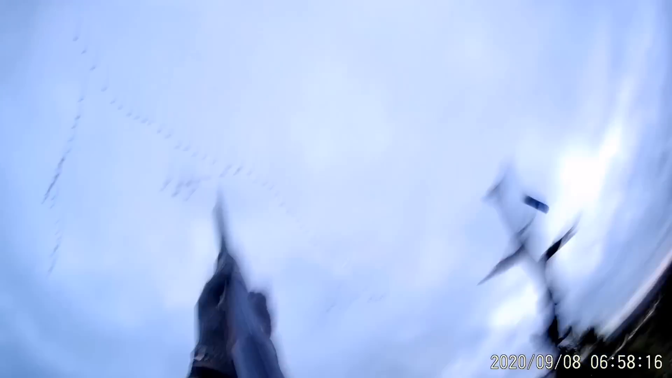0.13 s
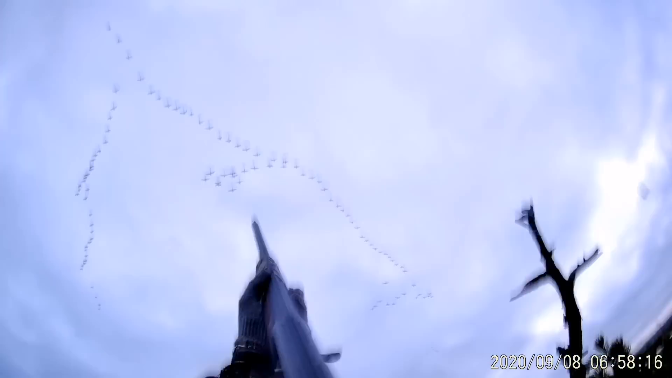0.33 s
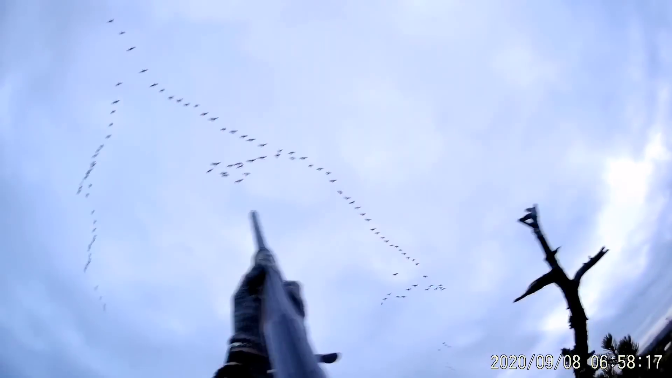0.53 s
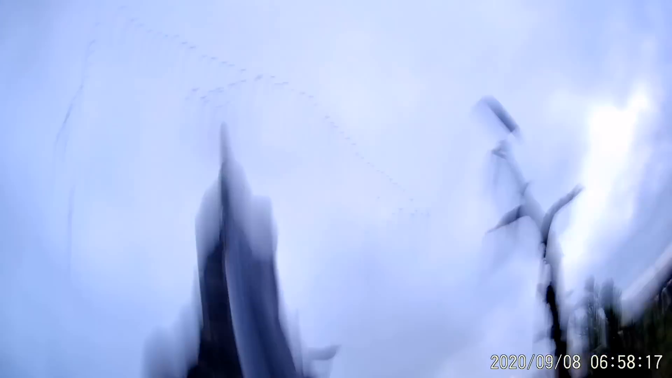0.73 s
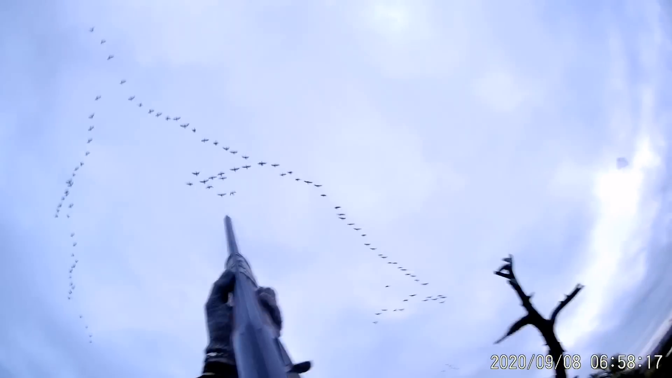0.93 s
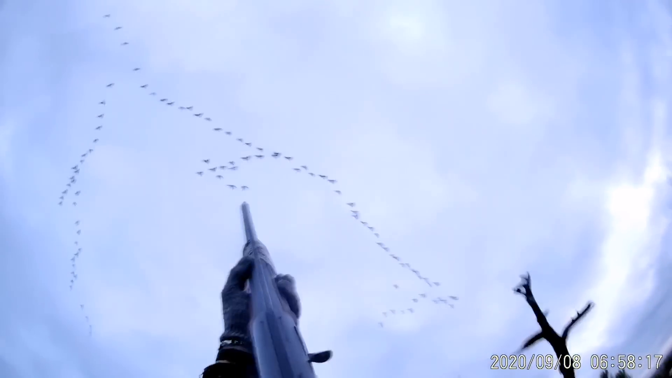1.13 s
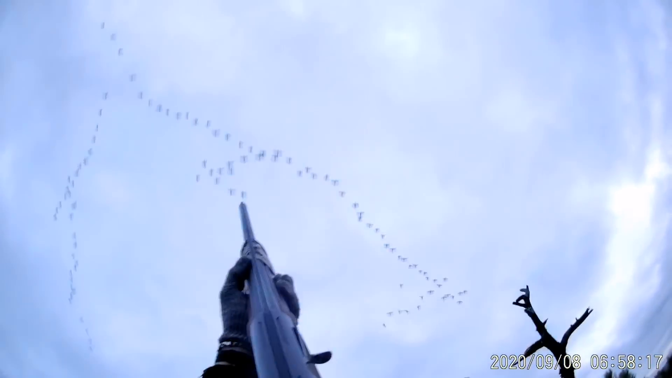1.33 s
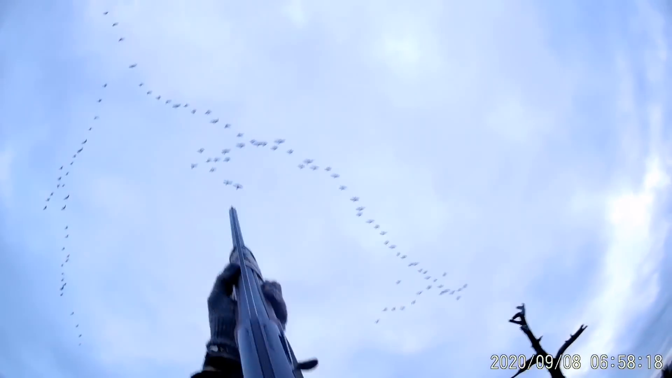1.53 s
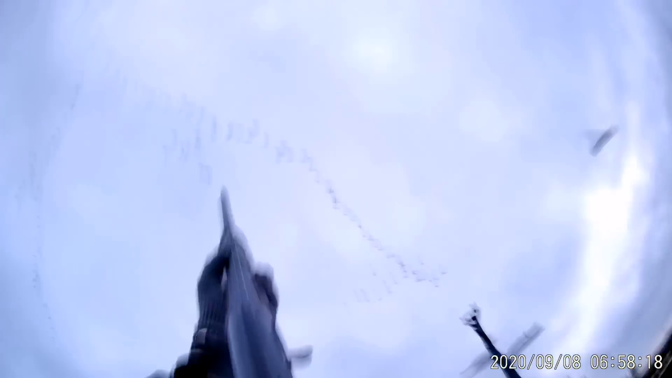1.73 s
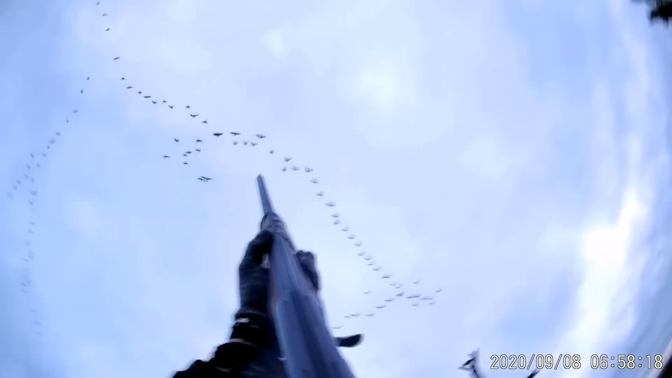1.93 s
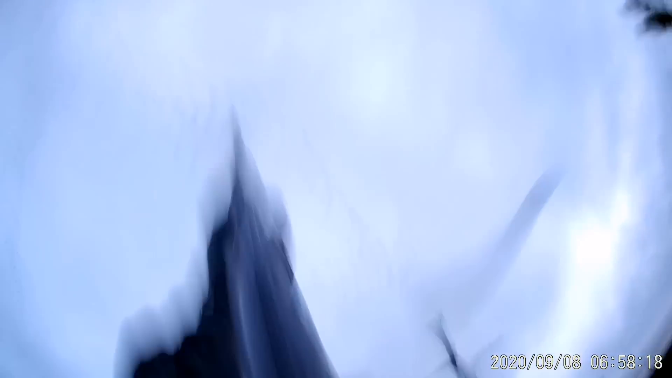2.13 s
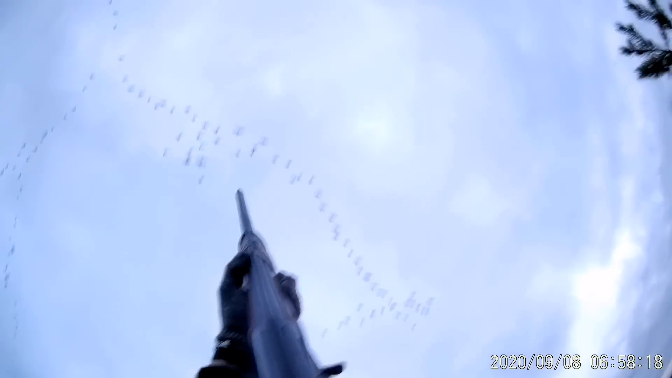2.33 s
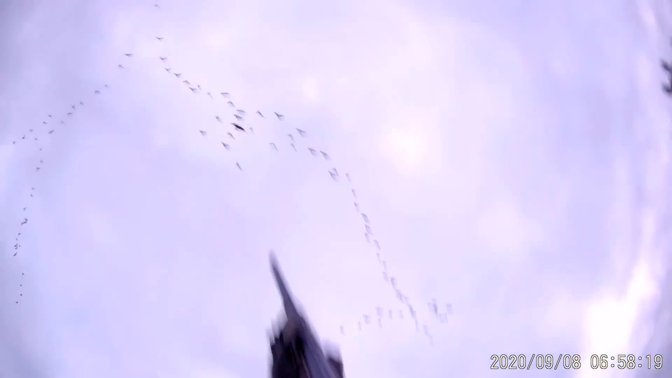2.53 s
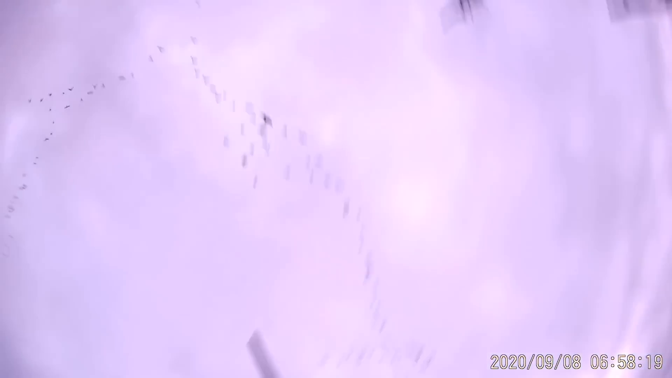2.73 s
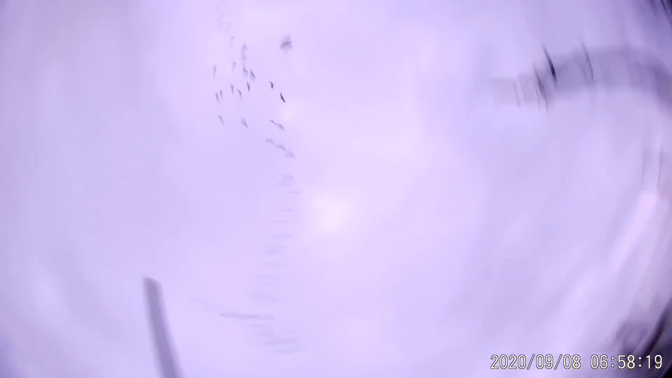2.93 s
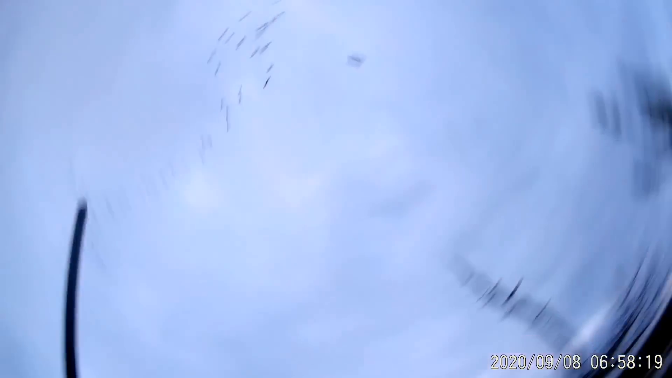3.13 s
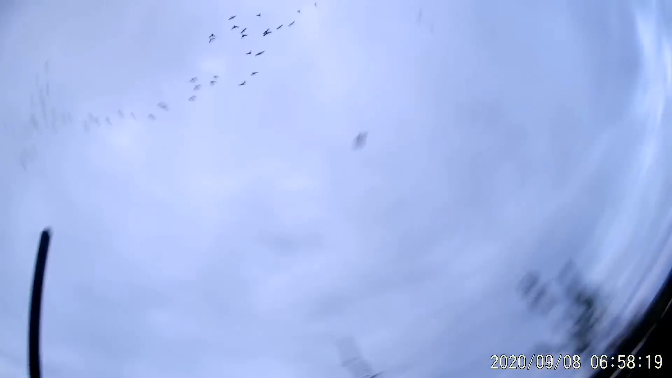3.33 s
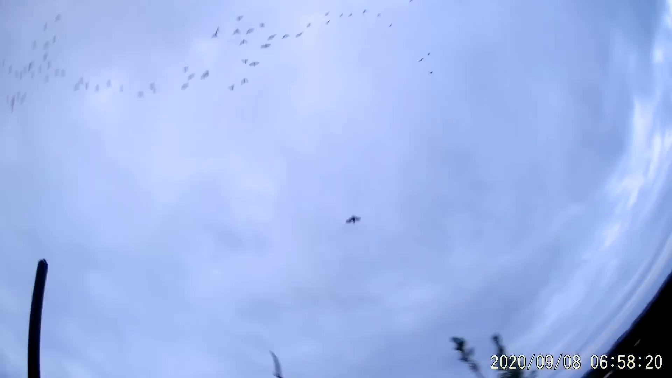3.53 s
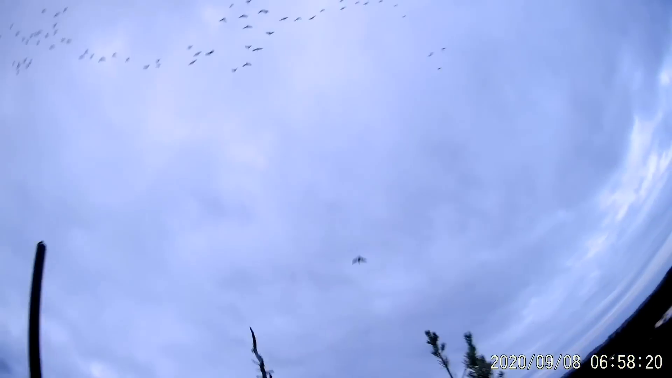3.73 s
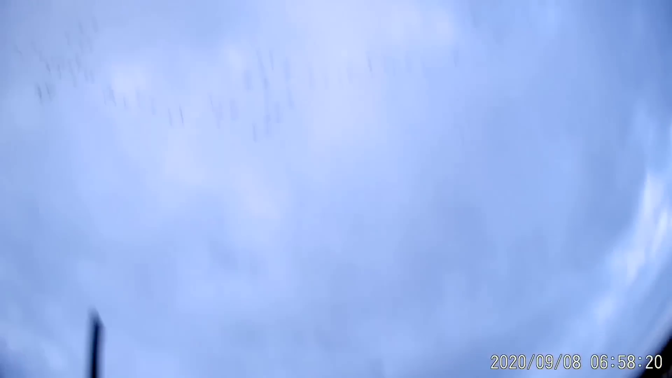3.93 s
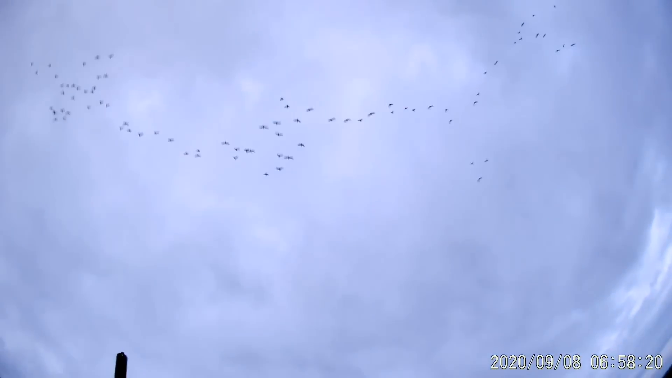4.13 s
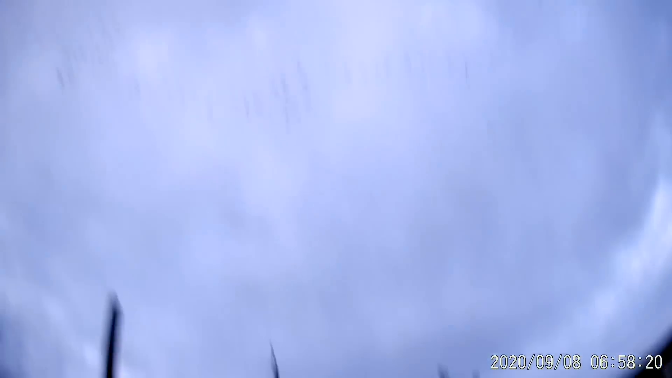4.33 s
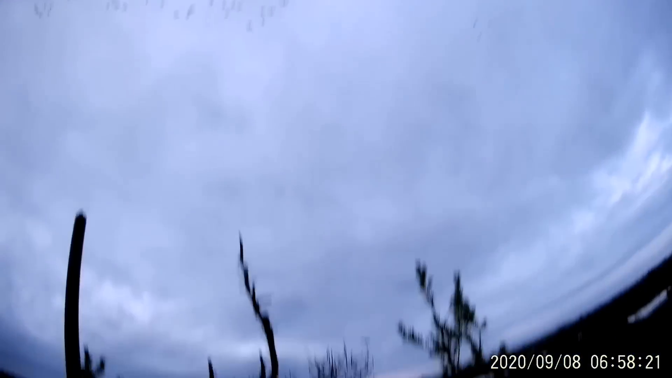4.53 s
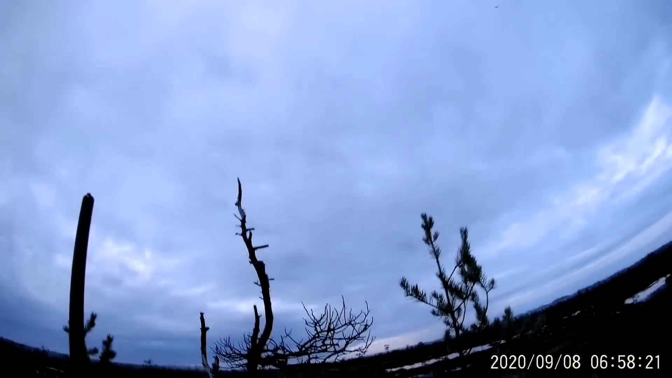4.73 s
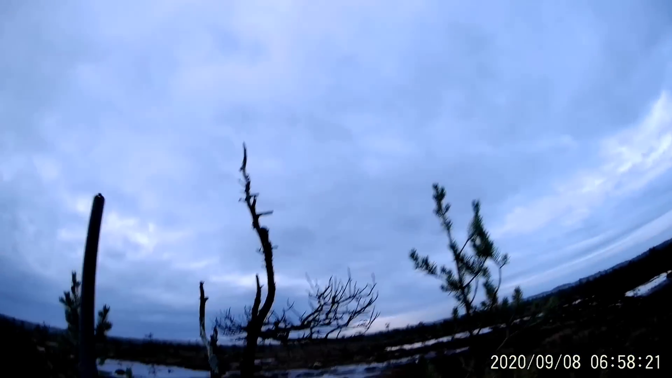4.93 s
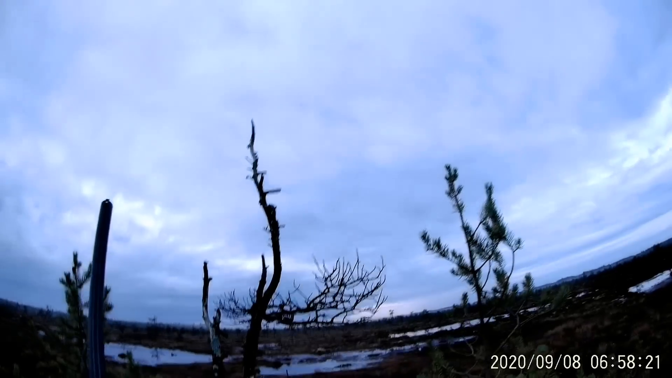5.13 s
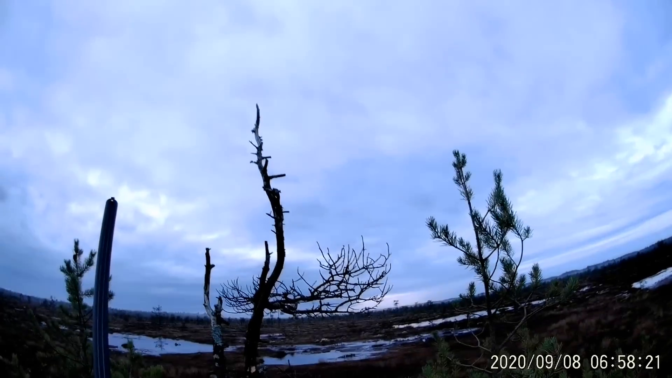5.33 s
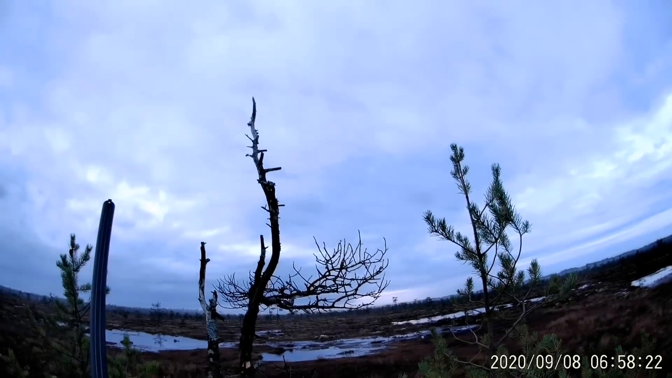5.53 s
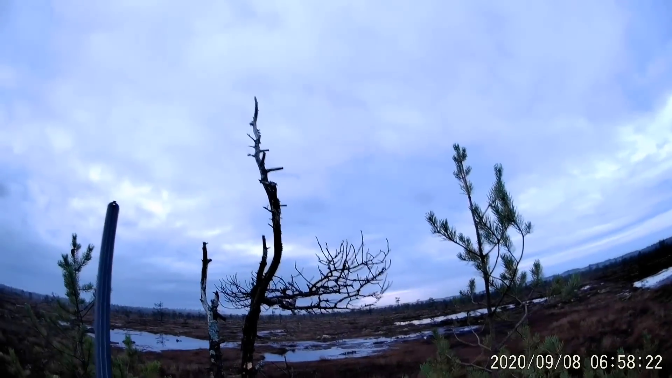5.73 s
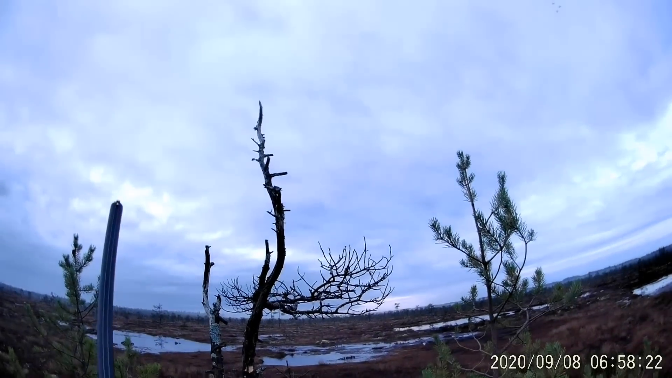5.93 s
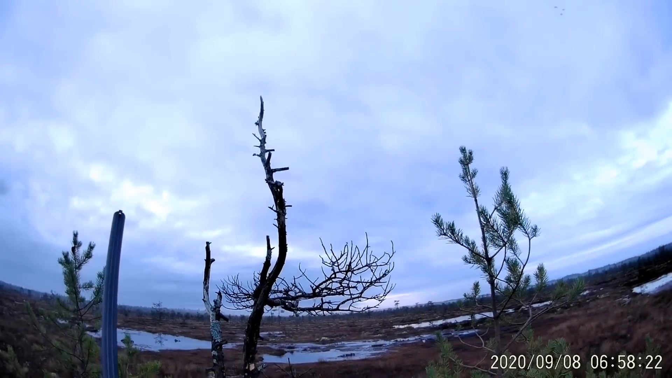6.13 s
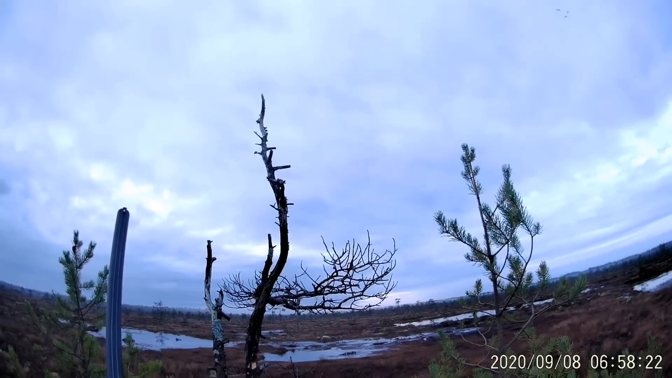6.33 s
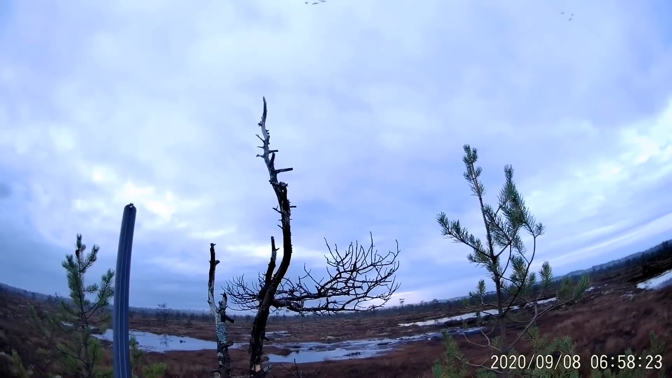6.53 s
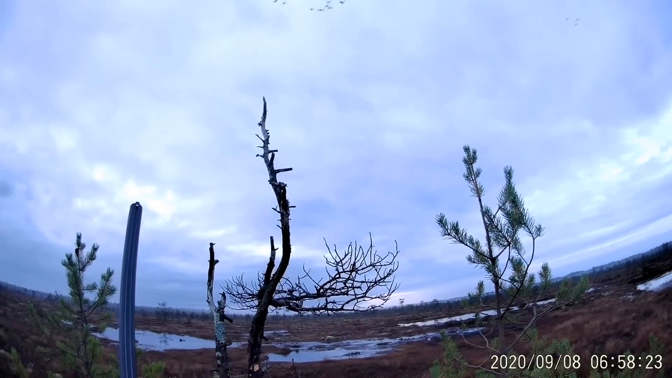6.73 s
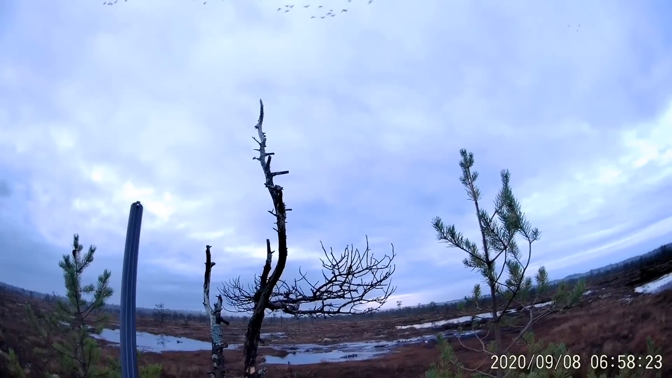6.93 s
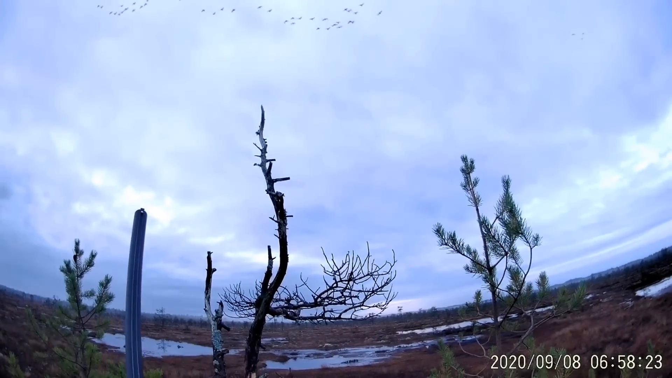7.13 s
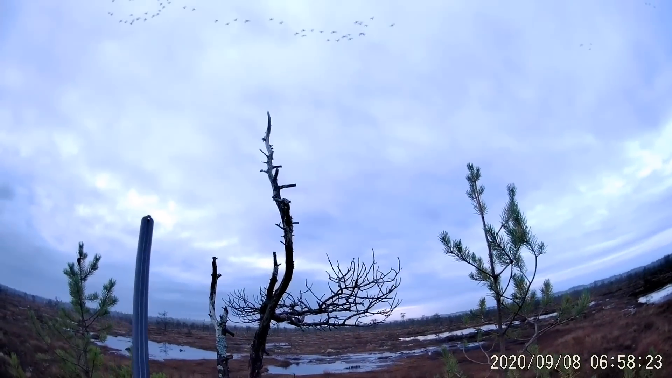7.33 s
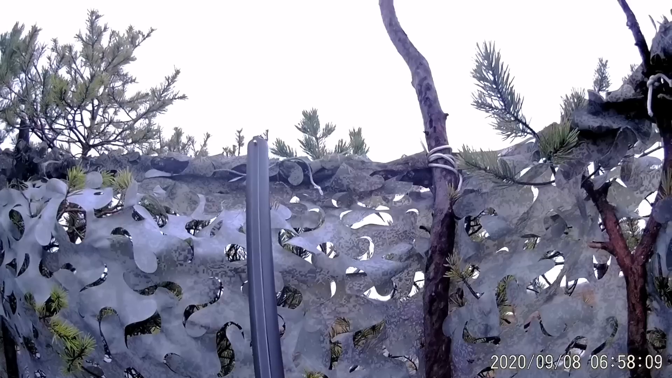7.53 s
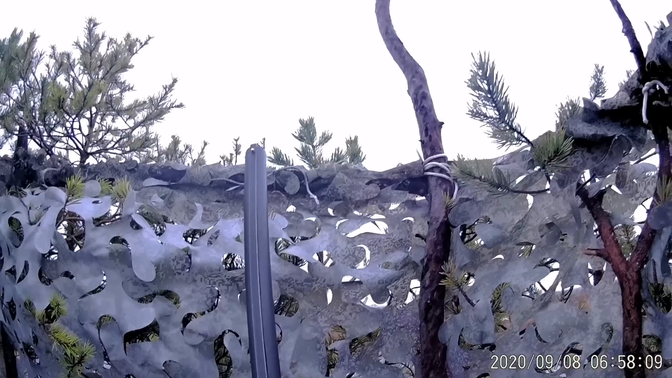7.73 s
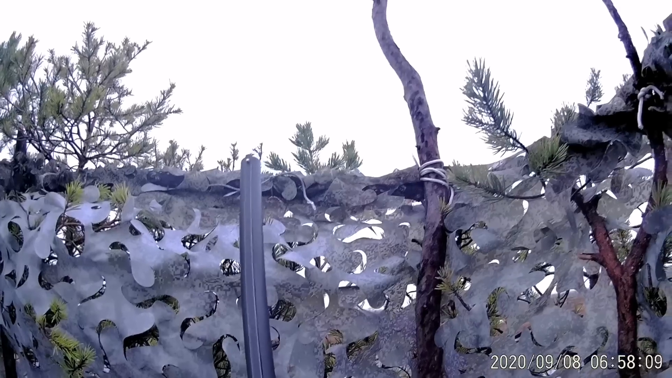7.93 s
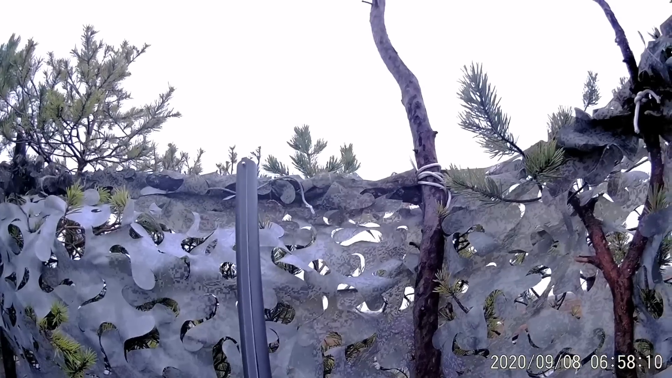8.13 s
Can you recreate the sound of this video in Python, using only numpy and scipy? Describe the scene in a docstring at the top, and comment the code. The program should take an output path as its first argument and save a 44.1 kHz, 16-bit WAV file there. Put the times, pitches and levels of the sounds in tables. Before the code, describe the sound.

A semi-automatic shotgun fires two pairs of shots over open marsh; alarmed geese swell into loud honking and yelping, then suddenly sound far away.

```python
"""Shotgun and geese over a marsh

A self-loading shotgun fires two pairs of shots: torn noise and a pressure push that overload the microphone,
then noise scrapes and a ringing slam from the action. Decaying noise and small dull reflections answer from
marsh and forest. Geese, built from harmonic buzzes with arching pitch, swell into an alarmed clamour;
after a cut the flock is much fainter and further away. Handling knocks and airy hiss lie underneath."""
import sys
import numpy as np
from scipy import signal
from scipy.fft import rfft, irfft, next_fast_len
from scipy.io import wavfile
from scipy.ndimage import uniform_filter1d

SR = 44100
rng = np.random.default_rng(int(sys.argv[2]) if len(sys.argv) > 2 else 0)


def to_wav(sig):
    """Store sig (one row per channel, or 1-D mono) as 16-bit WAV at the path in sys.argv[1].

    Samples outside -1..1 are clipped; the rate is SR.
    """
    pcm = np.clip(np.atleast_2d(sig), -1, 1) * 32767
    pcm = np.round(pcm).astype(np.int16)
    wavfile.write(sys.argv[1], SR, pcm.T)  # frames by channels


N = 366030
TIME = np.arange(N) / SR
CUT_S = 7.503  # the near flock gives way to the far one
LEAD_S = .01  # room ahead of each shot for sounds that precede it


def undb(db):
    """Decibels to gain."""
    return 10 ** (np.asarray(db) / 20)


def unit(x):
    """Scale to rms 1."""
    return x / np.sqrt(np.mean(x ** 2) + 1e-18)


def colour(x, points):
    """Filter by (frequency [Hz], gain [dB]) points joined on a log-frequency axis."""
    size = next_fast_len(len(x))
    hz, db = np.transpose(points)
    f = np.maximum(np.fft.rfftfreq(size, 1 / SR), 1)
    gain = undb(np.interp(np.log(f), np.log(hz), db))
    return irfft(rfft(x, size) * gain, size)[:len(x)]


def noise(points, size):
    """Coloured noise of rms 1."""
    return unit(colour(rng.standard_normal(size), points))


def walk(rate, size):
    """Random wander along straight lines between rate knots per second, drawn with a spread of 0.4."""
    knots = np.arange(size) / SR * rate
    return 0.4 * np.interp(knots, np.arange(2048), rng.standard_normal(2048))


def burst(t, rise, hold, decay):
    """Envelope that starts at t = 0, rises, holds until t = hold and dies away; all in seconds."""
    return np.clip(t / rise, 0, 1) * np.exp(-np.maximum(t - hold, 0) / decay)


def add(out, s, x):
    """Mix x into out from time s."""
    start = int(s * SR)
    x, start = x[max(-start, 0):], max(start, 0)
    out[start:start + len(x)] += x[:max(len(out) - start, 0)]


# The shots; delays count from the blast and levels trim each part:
# (time [s], blast level [dB], push level [dB], opening delay [s], opening level [dB],
#  shutting delay [s], shutting level [dB], forest delay [s], forest level [dB],
#  tree knock delay [s], tree knock level [dB])
SHOT_EVENTS = [(0.1249, -1.5, 0, .120, -2, .2112, -2, .288, -1, .3006, -10),
               (0.7656, -1.5, -1.5, .118, -1, .2135, -.5, .268, .5, .2814, -11),
               (1.6992, -1, 0, .116, -2, .2115, -3.5, .253, 0, .279, -14),
               (2.1891, 1, -3, .117, -1, .2135, -2.5, .25, -1.5, .278, -15)]


def shotgun():
    """Every shot sums its blast, the cycling action and the scatter from marsh and forest."""
    out = np.zeros(N)
    t = np.arange(2 * SR) / SR - LEAD_S
    near = t[:SR // 2]
    for (s, blast_db, push_db, open_s, open_db, shut_s, shut_db,
         forest_s, forest_db, *_) in SHOT_EVENTS:
        opening = undb(open_db) * action_opens(near - open_s)
        shutting = undb(shut_db) * action_shuts(near - shut_s)
        add(out, s - LEAD_S, undb(blast_db) * muzzle(near, push_db))
        add(out, s - LEAD_S, opening + shutting)
        add(out, s - LEAD_S, echoes(t, forest_s, forest_db))
    return out


# Colour of the torn gas: (frequency [Hz], relative level [dB])
BLAST_COLOUR = [(30, -9), (90, -4.5), (190, 2.5), (320, -3), (750, -3), (1100, -10), (2500, -14),
                (4400, -14.5), (8300, -17), (9200, -29), (16000, -47.5)]
# Colour of the rustling brush: (frequency [Hz], relative level [dB])
BRUSH_COLOUR = [(60, -17), (300, 2.5), (750, 1), (1300, -5.5), (3000, -7.5), (7500, -6), (10000, -12),
                (16000, -25)]


def muzzle(t, push_db):
    """The trigger's tick, then a pressure push with a longer suction, torn by turbulent gas."""
    size = len(t)
    tick = undb(-21.5) * noise(OPENING_COLOUR, size)
    tick *= burst(t + .005, rise=0.0013, hold=0.0083, decay=.002)
    push = undb(-10.0) * burst(t, rise=0.015, hold=0.0072, decay=0.0017)
    suction = undb(3.0) * burst(t - .0095, rise=0.00097, hold=0.0022, decay=0.004)
    pressure = push - suction
    gas = undb(1.5) * noise(BLAST_COLOUR, size) * burst(t, rise=0.00039, hold=.015, decay=0.0059)
    # the overloaded microphone spits as the pressure lets go
    spit = undb(-11.0) * noise([(3000, -18.5), (9000, -13.5), (16000, -0.5)], size)
    spit *= burst(t - .016, rise=0.00078, hold=0.01, decay=0.0028)
    brush = undb(-19.5) * noise(BRUSH_COLOUR, size) * burst(t, rise=0.0066, hold=0.026, decay=0.032)
    rustle = brush * undb(2 * walk(180, size))
    return tick + undb(push_db) * pressure + gas + spit + rustle


# Colour of the opening bolt, shared by the trigger's tick: (frequency [Hz], relative level [dB])
OPENING_COLOUR = [(60, -9), (250, -9), (850, 4), (1500, -2.5), (2000, -13), (3000, 2), (5500, -7.5),
                  (8300, -2), (9000, -37), (16000, -51.5)]


def action_opens(t):
    """The bolt unlocks with a scrape and rattles against its rear stop."""
    scrape = undb(-22) * burst(t + .006, rise=.001, hold=.004, decay=.004)
    stop = undb(-9.0) * burst(t, rise=0.0016, hold=0.0055, decay=0.0047)
    rattle = undb(0.58 * walk(750, len(t)))
    return noise(OPENING_COLOUR, len(t)) * (scrape + stop) * rattle


# Colour of the slamming bolt: (frequency [Hz], relative level [dB])
SHUTTING_COLOUR = [(60, -28.5), (400, -6), (900, 7), (1500, -11.5), (2600, -4.5), (4400, -4), (8200, -4),
                   (9000, -60), (16000, -43)]


def action_shuts(t, ring_hz=880):
    """The bolt slams home: a hard crack and a short hollow ring of the gun's body."""
    crack = undb(-6.0) * noise(SHUTTING_COLOUR, len(t))
    crack *= burst(t, rise=0.00024, hold=0.0021, decay=0.00083)
    ring = undb(-3.5) * np.sin(2 * np.pi * ring_hz * t)
    ring *= burst(t, rise=.0007, hold=0.0011, decay=0.0029)
    return crack + ring


# Colour of the marsh scatter, shared by the tree ticks: (frequency [Hz], relative level [dB])
MARSH_COLOUR = [(40, -21.5), (200, 1), (700, 5.5), (1400, -3.5), (2500, -7.5), (5000, -12.5), (8000, -16),
                (10000, -29.5), (16000, -48)]
# Colour of the forest edge's answer: (frequency [Hz], relative level [dB])
FOREST_COLOUR = [(60, -25), (200, -21.5), (450, -3), (700, 0.5), (950, -9), (1300, -17.5), (3000, -25),
                 (8000, -31.5), (16000, -47.5)]


def echoes(t, forest_s, forest_db, lumpy_db=3.5):
    """Marsh scatter dies slowly; the forest edge returns a roll of many small dull reflections."""
    size = len(t)
    marsh = undb(-34.5) * burst(t, rise=.03, hold=0.23, decay=0.12)
    marsh += undb(-55) * burst(t, rise=.1, hold=.3, decay=0.86)
    since = t - forest_s
    forest = undb(forest_db - 27.0) * burst(since, rise=0.0045, hold=0.052, decay=0.048)
    forest += undb(-53.0) * burst(since, rise=0.089, hold=0.074, decay=0.099)
    # about 900 trunks a second reflect, with random sign and uneven strength
    hits = rng.random(size) < 900 / SR
    signs = rng.choice([-1, 1], size)
    trunks = hits * signs * undb(lumpy_db * np.minimum(rng.exponential(size=size), 3))
    scatter = marsh * noise(MARSH_COLOUR, size) * undb(2 * walk(90, size))
    return scatter + forest * unit(colour(trunks, FOREST_COLOUR))


# Stands of trees that return every shot: (time after the nearest [s], level trim [dB])
STAND_REFLECTIONS = [(0, 2), (.013, -14.5), (.027, -8.5), (.057, -12), (.137, -17.5), (.22, -23.5)]


def tree_echoes(hz=680, length=0.002):
    """Each stand of trees returns each shot as a dull knock of a few cycles with a faint tick."""
    out = np.zeros(N)
    t = np.arange(SR // 25) / SR - LEAD_S
    for s, *_, knock_s, knock_db in SHOT_EVENTS:
        chances = rng.standard_normal((len(STAND_REFLECTIONS), 2))
        for (later_s, db), (detune, phase) in zip(STAND_REFLECTIONS, chances):
            knock_hz = hz * undb(1.2 * detune)
            knock = np.sin(2 * np.pi * (knock_hz * t + phase)) * np.exp(-np.abs(t) / length)
            tick = undb(-19.5) * noise(MARSH_COLOUR, len(t))
            tick *= burst(t, rise=.0003, hold=0.0011, decay=.002)
            add(out, s + knock_s + later_s - LEAD_S, undb(knock_db + db) * (knock + tick))
    return out


# Single geese, before throat colour and air:
# (time [s], length [s], first pitch before arch [Hz], last pitch before arch [Hz],
#  relative level [dB], tilt [dB per harmonic])
GOOSE_CALLS = [(.083, 0.032, 994, 990, -77, 7), (.522, .068, 1800, 1717, -42, -10),
               (.565, .09, 1620, 1480, -40.5, 2.5), (.694, .07, 1469, 1440, -51, 1),
               (2.07, .06, 1470, 1540, -49, -6), (2.111, 0.065, 1770, 1814, -38, 0),
               (4.1, 0.13, 1530, 1438, -43, 2), (4.17, 0.08, 1420, 1320, -50, 1.5),
               (4.421, 0.072, 1400, 1350, -50, 2.5), (4.71, 0.088, 1805, 1790, -51, -3),
               (4.92, 0.043, 2050, 2040, -52, 4.5), (5.14, 0.13, 1464, 1420, -49, 0),
               (5.302, 0.072, 1387, 1280, -42.5, -2), (5.395, .11, 1455, 1423, -47, 2),
               (5.52, .072, 1836, 1700, -38, -3), (5.678, 0.066, 1823, 1694, -44, 1),
               (5.77, 0.1, 1807, 1770, -46, 2.5), (5.84, .07, 1458, 1507, -44, 1),
               (6.295, 0.13, 1519, 1355, -43, 0.5), (6.51, 0.024, 1490, 1495, -38, -1),
               (6.649, .1, 1715, 1470, -43, 1), (6.753, .11, 1557, 1470, -44.5, 1),
               (6.89, .09, 1410, 1624, -46, 2), (7.12, 0.039, 1530, 1570, -44.5, -2.5),
               (7.19, .097, 850, 835, -45.5, -2), (7.447, .058, 1520, 1548, -47.5, 2),
               (7.518, 0.078, 1168, 1160, -56, -6.5), (7.59, .075, 1520, 1680, -51, -8),
               (7.719, .07, 1606, 1550, -54.5, -6), (7.85, .07, 1620, 1786, -56.5, 1.5),
               (7.996, .1, 1556, 1584, -56, 0.5), (8.06, .1, 1470, 1400, -58, -4),
               (8.212, .05, 1430, 1400, -62, -9.5)]
# A goose's throat heard through the air, shared by the flock: (frequency [Hz], gain [dB])
THROAT_COLOUR = [(500, -11), (850, 1), (1150, -3.5), (1500, 0), (1920, -5), (2250, -14), (3100, -15),
                 (4600, -11), (5800, -18.5), (7500, -33.5), (11000, -41), (16000, -50.5)]


def near_geese():
    """Single clear voices, buzzed through the throat colour, stand out of the flock."""
    out = np.zeros(N)
    chances = rng.standard_normal((len(GOOSE_CALLS), 2, 44))
    for (s, length, first_hz, last_hz, db, tilt_db), chance in zip(GOOSE_CALLS, chances):
        call = yelp(length, first_hz, last_hz, tilt_db, chance, arch=0.02, jitter=.006, flutter_db=3.7)
        add(out, s, undb(db) * call)
    return undb(1.5) * open_air(colour(out, THROAT_COLOUR), wet_db=-12, decay=.04)


def yelp(length, first_hz, last_hz, tilt_db, chance, arch=.035, jitter=.005, flutter_db=5.0):
    """A buzzing syrinx whose pitch arches and trembles; chance holds two rows of random values."""
    u = np.linspace(0, 1, int(length * SR))
    tremble, flutter = (np.interp(u, np.linspace(0, 1, len(row)), row) for row in chance)
    effort = np.abs(np.sin(np.pi * u))
    glide_hz = first_hz + (last_hz - first_hz) * u
    hz = glide_hz * (1 + arch * (effort - .5) + jitter * tremble)
    turn = np.exp(2j * np.pi * np.cumsum(hz) / SR)
    # the overtones bloom in the middle of the call, where it is pushed hardest
    step = turn * undb(tilt_db + 4 * (effort - 0.92))
    partial, buzz = turn, 0
    for _ in range(min(9, int(SR / 4 / first_hz))):
        buzz = buzz + partial.imag
        partial = partial * step
    return buzz * np.sqrt(effort) * undb(flutter_db * flutter)


def open_air(x, wet_db, decay):
    """Direct sound plus faint scatter from ground and shrubs, as a decaying noise tail."""
    t = np.arange(SR // 2) / SR
    tail = rng.standard_normal(len(t)) * np.exp(-t / decay)
    return x + undb(wet_db) * signal.fftconvolve(x, tail / np.linalg.norm(tail))[:N]


# The blur of the farthest birds: (frequency [Hz], relative level [dB])
BLUR_COLOUR = [(100, -24.5), (180, -20), (260, -4.5), (380, -9), (650, -2), (870, 3.5), (1150, -0.5),
               (1800, -3.5), (2300, -10), (4800, -11.5), (7000, -23.5), (15000, -41)]
# Extra calling at the loudest clamour, as a multiple of the base call rate
ALARM_CALLING = 5.5


def flock(count=780, honk_hz=890, yelp_hz=1590, honk_share=.3, glide_span=.11):
    """Overlapping low honks and high yelps over a distant blur; a louder flock calls more often."""
    level_db, treble_db = flock_levels()
    rate = 1 + ALARM_CALLING * undb(level_db - level_db.max())
    busy = np.cumsum(rate)
    # one call in each equal share of the busyness
    shares = (np.arange(count) + rng.random(count)) / count
    starts = np.interp(shares, busy / busy[-1], TIME) - .04
    characters = rng.random((count, 3))
    moods = rng.standard_normal((count, 3))
    chances = rng.standard_normal((count, 2, 50))
    calls = np.zeros(N)
    for s, (kind, spread, span), (glide, loud, bright), chance in zip(starts, characters, moods, chances):
        if kind < honk_share:
            hz = honk_hz * (1 + .32 * (spread - .5))
        else:
            hz = yelp_hz * (1 + .6 * (spread - .5))
        last_hz = hz * (.975 + glide_span * glide / 2)
        tilt_db = 1.5 * np.clip(bright, -2, 1)
        call = yelp(.035 + .055 * span, hz, last_hz, tilt_db, chance, arch=.05, jitter=.007, flutter_db=5.0)
        add(calls, s, undb(3.0 * np.minimum(loud, 1.7)) * call)
    voices = open_air(colour(calls, THROAT_COLOUR), wet_db=-8, decay=.07)
    # even out the voices over a fifth of a second, so that the level tables shape the swell
    voices /= np.sqrt(uniform_filter1d(voices ** 2, SR // 5) + 1e-12)
    # the more birds call, the thicker the blur behind them
    blur = undb(-5) * np.sqrt(rate / rate.max()) * noise(BLUR_COLOUR, N) * undb(1.5 * walk(25, N))
    clamour = undb(-2.5) * voices + blur
    # body and treble part at 2600 Hz so that the brightness can move on its own
    highpass = signal.butter(2, 2600, "high", fs=SR, output="sos")
    treble = signal.sosfiltfilt(highpass, clamour)
    body = clamour - treble
    return undb(level_db) * (unit(body) + undb(treble_db) * unit(treble))


# The flock while the gun fires: (time [s], level before lulls [dB], treble relative to it [dB])
CALM_LEVELS = [(0, -47, -9.5), (.6, -49, -4.5), (.8, -56, -4), (1.55, -57, -21), (2.2, -56, -12)]
# The alarm after the last shot: (time [s], level before lulls [dB], treble relative to it [dB])
ALARM_LEVELS = [(2.68, -42, -6.5), (3.03, -52, -6), (3.13, -40, -10), (3.38, -39, -5), (3.87, -41, -10),
                (3.94, -37, -14), (4.43, -42, -6), (4.81, -37, -16), (4.88, -42, -10.5), (5.85, -39, -15.5),
                (6.27, -47, -4.5), (6.38, -42, -12), (6.74, -39, -14), (7.37, -46, -11.5),
                (7.49, -44, -16.5)]
# Lulls in the clamour: (middle time [s], half length [s], level change [dB])
CLAMOUR_LULLS = [(4.378, .05, -3), (6.36, .075, -6)]
FAR_FLOCK_DB, FAR_TREBLE_DB = -64, -10.5  # after the cut; treble relative to the flock


def flock_levels():
    """Flock level and relative treble in dB: calm, alarmed with brief lulls, then far after the cut."""
    s, level_db, treble_db = np.transpose(list(CALM_LEVELS) + list(ALARM_LEVELS))
    lull_db = sum(db * np.exp(-((TIME - middle) / half) ** 2) for middle, half, db in CLAMOUR_LULLS)
    near = TIME < CUT_S
    flock_db = np.where(near, np.interp(TIME, s, level_db) + lull_db, FAR_FLOCK_DB)
    bright_db = np.where(near, np.interp(TIME, s, treble_db), FAR_TREBLE_DB)
    return flock_db, bright_db


# Small knocks of gun and clothing:
# (time [s], level [dB], centre [Hz], half width [octaves], decay [s])
HANDLING_KNOCKS = [(3.562, -37.5, 7000, 0.27, 0.0035), (3.881, -34.5, 235, 0.85, 0.014)]


def handling():
    """A tick and a soft bump as the gun is lowered, each a short burst of banded noise."""
    out, t = np.zeros(N), np.arange(SR // 4) / SR
    for s, db, hz, octaves, decay in HANDLING_KNOCKS:
        band = [(hz / 16 ** octaves, -30), (hz / 2 ** octaves, 0),
                (hz * 2 ** octaves, 0), (hz * 16 ** octaves, -60)]
        knock = noise(band, len(t)) * burst(t, rise=0.0015, hold=0.0018, decay=decay)
        add(out, s, undb(db) * knock)
    return out


# Still air with microphone hiss: (frequency [Hz], relative level [dB])
AIR_COLOUR = [(30, 1), (150, -2), (270, -1), (500, -2), (1000, -6), (3000, -14), (8000, -25),
              (14000, -26.5), (16000, -32)]


def still_air():
    """Steady coloured noise with a slight wander in level, quieter after the cut."""
    level_db = np.where(TIME < CUT_S, -57, -63)
    return noise(AIR_COLOUR, N) * undb(level_db + walk(5, N))


def scene():
    """Gun and its echoes, geese, handling and still air on one channel."""
    gun = shotgun() + tree_echoes()
    geese = flock() + near_geese()
    return (gun + geese + handling() + still_air())[None]


def record(dry):
    """The microphone stage clips, its coupling capacitor swings back after each blast, the top is cut."""
    clipped = dry / (1 + (np.abs(dry) / .95) ** 6) ** (1 / 6)
    coupling = signal.butter(1, 3.5, "high", fs=SR, output="sos")
    coupled = signal.sosfilt(coupling, clipped)
    top_cut = signal.ellip(8, .2, 70, 15700, fs=SR, output="sos")
    return signal.sosfilt(top_cut, coupled)


dry = scene()
out = record(dry)
to_wav(out)
```